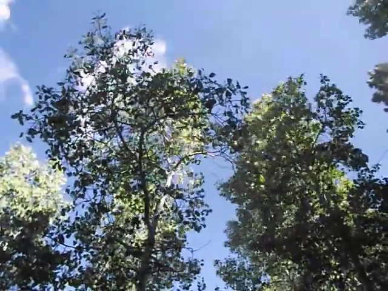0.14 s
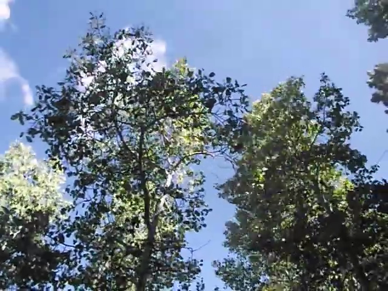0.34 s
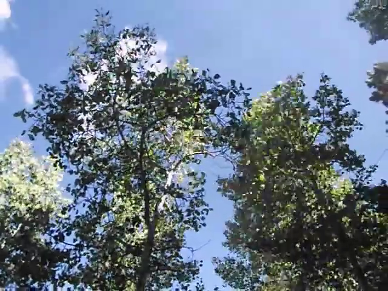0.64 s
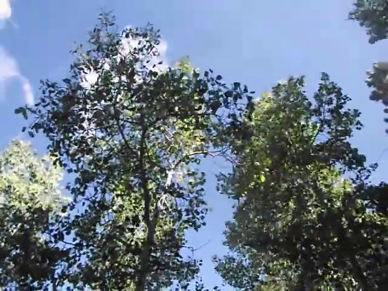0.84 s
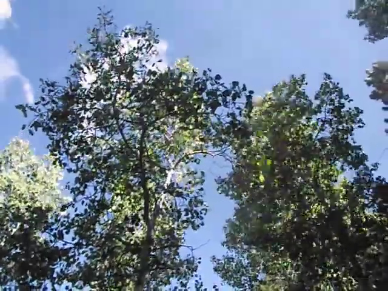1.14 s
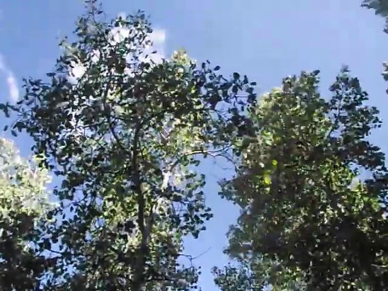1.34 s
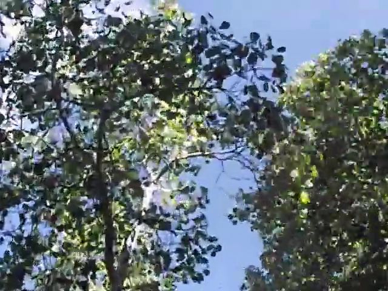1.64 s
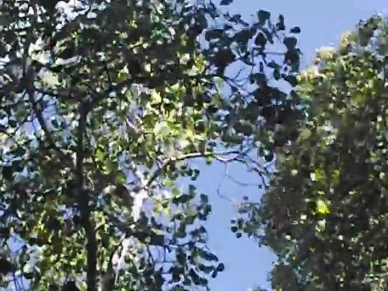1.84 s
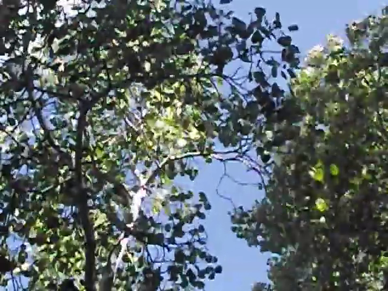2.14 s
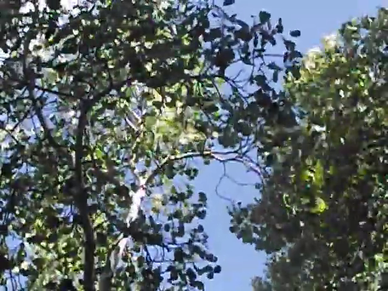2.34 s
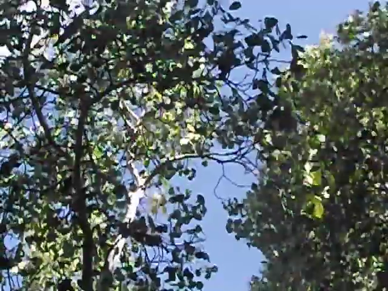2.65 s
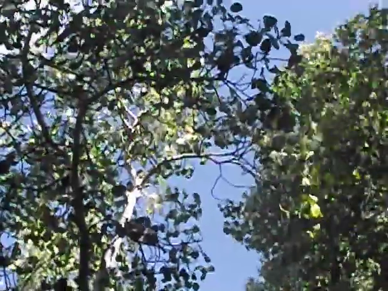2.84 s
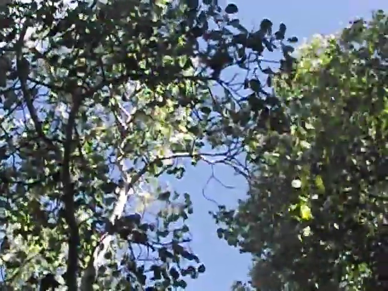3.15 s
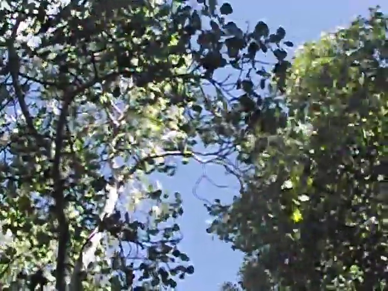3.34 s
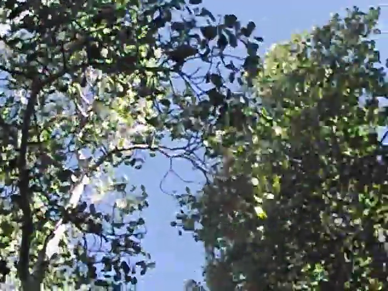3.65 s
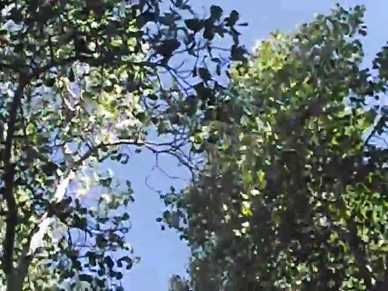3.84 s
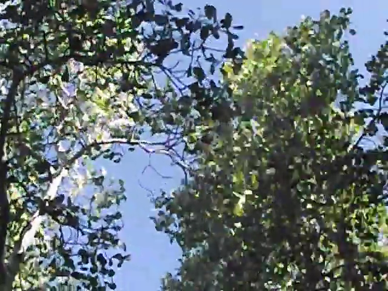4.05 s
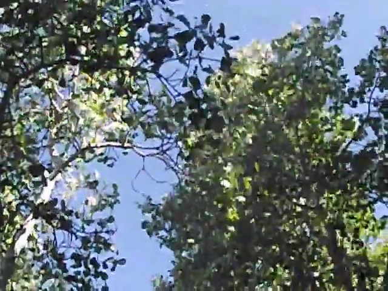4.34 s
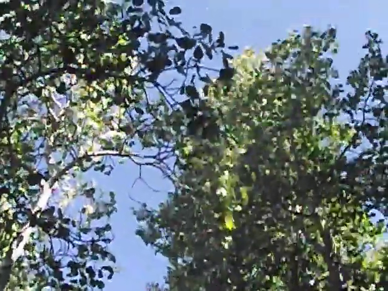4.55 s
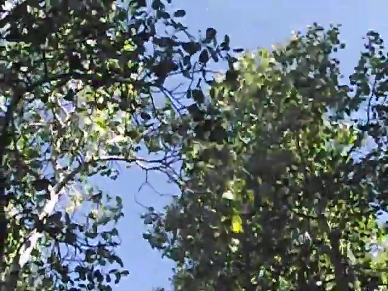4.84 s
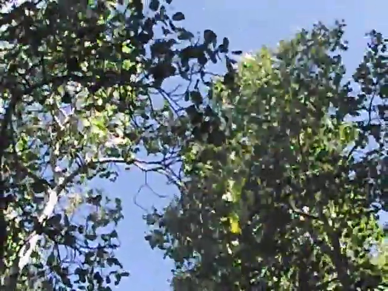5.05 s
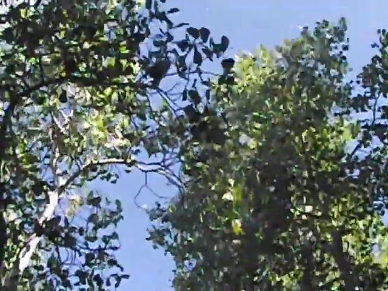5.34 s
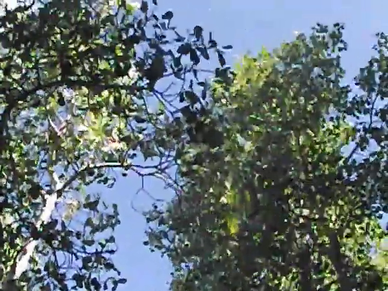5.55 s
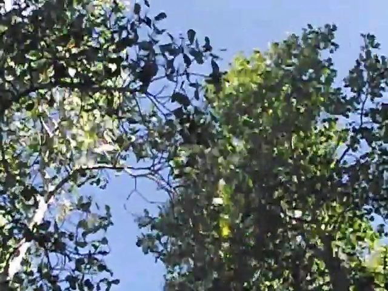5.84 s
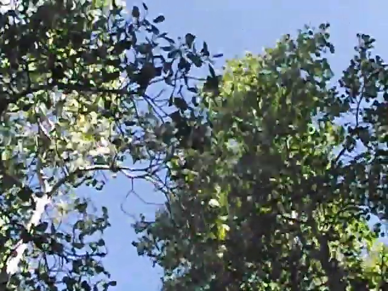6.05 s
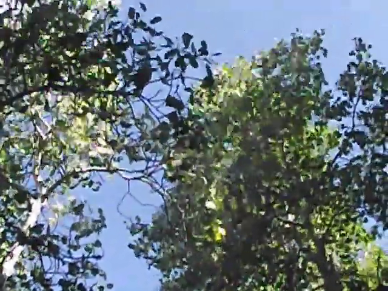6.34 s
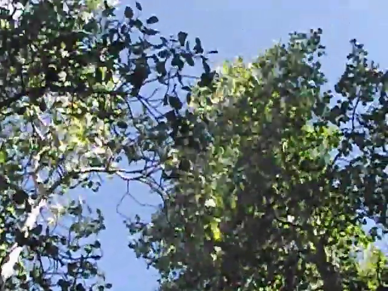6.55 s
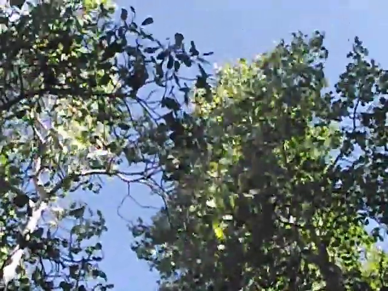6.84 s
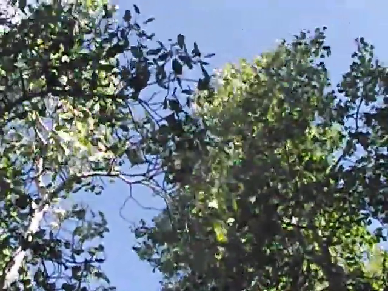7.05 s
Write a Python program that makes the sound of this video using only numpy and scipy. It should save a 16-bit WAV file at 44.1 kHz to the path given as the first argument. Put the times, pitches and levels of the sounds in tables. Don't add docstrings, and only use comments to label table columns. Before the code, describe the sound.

Countless small leaves hiss steadily in a light, fading breeze, with soft wind bumps at the microphone and one hard plastic snap around four seconds.

```python
import sys
import numpy as np
from scipy import signal
from scipy.fft import rfft, irfft, next_fast_len
from scipy.io import wavfile
from scipy.ndimage import uniform_filter1d

SR = 44100
rng = np.random.default_rng(int(sys.argv[2]) if len(sys.argv) > 2 else 0)


def invert_db(x):
    u = np.asarray(x, float) / 20
    return 10 ** u


def generate_wav(signal):
    frames = np.transpose(np.atleast_2d(signal))
    scaled = np.clip(frames, -1, 1) * 32767
    pcm = np.round(scaled).astype(np.int16)
    wavfile.write(sys.argv[1], SR, pcm)


N = 317961

# (time [s], strength [dB])
BREEZE = [(0.0, -1), (1.0, 0.5), (1.8, 0), (3.5, -3), (5.3, -5), (6.2, -5), (7.21, -7)]
# (frequency [Hz], level per Hz [dB])
LEAF_TONE = [(900, -21.5), (1700, -13), (2300, -7), (2700, -3), (3150, -0.43), (3400, -1.44), (3900, -7),
             (4400, -10), (4950, -12.5), (5200, -16), (5400, -22), (5500, -26)]
# (frequency [Hz], level per Hz [dB])
CANOPY_TONE = [(40, -2.5), (90, 0), (200, -0.2), (400, -2), (850, -1.8), (1200, -4), (2000, -6.5),
               (4000, -7.5), (5500, -19)]
# (frequency [Hz], level per Hz [dB])
EDDY_TONE = [(2, -7.5), (5, -4), (15, -2.5), (35, -8), (50, -11.5), (70, -20), (150, -47)]
# (time of peak [s], rise [dB], length [s])
GUSTS = [(.12, 5, 0.23), (.55, 8.5, 0.29), (1.1, 2.5, .2), (1.6, 3, .3), (3.8, 2.5, 0.32),
         (4.25, 2.5, 0.24), (5.28, 8, .2), (5.52, 6, .15), (5.88, 5.5, .25), (6.2, 4.5, .25), (6.75, 2, .4)]
# (start [s], pressure [full scale], rise [ms])
PUSHES = [(.005, -.05, 6), (.152, .06, 7), (.178, -.04, 11), (.472, -.05, 18), (.54, .045, 8),
          (1.82, -.03, 12), (4.67, -.04, 9), (5.765, .035, 14), (6.12, -.055, 20), (6.172, .145, 15),
          (6.254, .04, 9)]
# (frequency [Hz], level [dB], time to fall 60 dB [s])
SHELL_MODES = [(893, -6.5, 0.044), (1270, -15, 0.024), (1625, -10, 0.034), (2010, -11.5, 0.023),
               (2360, -1, 0.022), (2506, 1.5, 0.013), (2807, -1.5, 0.029), (3320, -8.5, 0.0037)]
# (time [s], ring [dB], buzz [dB], buzz length [ms], buzz pitch [Hz])
SNAPS = [
    (3.5678, -37, -27, 5.2, 1930),
    (3.5680, -40, -24, 5.0, 2350),
    (4.0122, -6.5, -1.3, 2.5, 2500),
    (5.7907, -31, -25, 2.8, 2250),
    (6.2555, -29, -29, 4.5, 2300),
    (6.2680, -34, -31, 3, 2400),
]
# (time [s], level [dB])
CREAKS = [
    (3.840, -22),
    (3.895, -23),
]
# (time [s], pitch [Hz], level [dB], time to fall 60 dB [s])
KNOCK = (1.415, 480, -30.5, .12)

LEAVES_DB, CANOPY_DB, BUFFET_DB = -33, -38.5, -42.5
CANOPY_FOLLOWS, CANOPY_LEADS_S = 0.63, 0.79
SWING_BACK, SWING_SLOWER = 0.35, 2.5
LOW_MODE_DB = 3.5
HUM_HZ, HUM_DB = 120.2, -61
OFFSET, CEILING = -0.0029, 0.72


def leaves(pats_per_s=24000, spread_db=1.33, flutter_db=0.57, cycles=3.27):
    out = np.zeros(N)
    t = np.arange(400) / SR
    pitches = np.geomspace(900, 5400, 16)
    for hz in pitches:
        chance = rng.random(N)
        size = np.minimum(rng.exponential(1, N), 5)
        hits = (chance < pats_per_s / len(pitches) / SR) * invert_db(spread_db * size)
        pat = np.sin(2 * np.pi * hz * t) * np.exp(-t * hz / cycles) * (1 - np.exp(-t * hz * 2))
        group = evened(signal.oaconvolve(hits, pat)[:N])
        out += group * invert_db(flutter_db * drift(12)) * np.sqrt(hz)
    spectrum = rfft(out)
    smooth = uniform_filter1d(abs(spectrum) ** 2, 1500)
    level = irfft(spectrum / np.sqrt(smooth + 1e-9), N)
    return invert_db(LEAVES_DB + breeze_db()) * colour(level, LEAF_TONE)


def wind(lumps_db=1.74):
    t = np.arange(N) / SR
    gusts_db = sum(db * np.exp(-np.log(16) * ((t - s) / length) ** 2) for s, db, length in GUSTS)
    loudness = invert_db(BUFFET_DB + gusts_db + lumps_db * drift(5))
    out = loudness * colour(rng.standard_normal(N), EDDY_TONE)
    for s, pressure, rise_ms in PUSHES:
        u = np.arange(SR // 2) * 1000 / SR / rise_ms
        v = u / SWING_SLOWER
        push = (u * np.exp(1 - u)) ** 2
        swing = (v * np.exp(1 - v)) ** 2
        add(out, s, pressure * (push - SWING_BACK * swing))
    return out


def shell(low_rise_ms=2.8, glide=0.24, overtone_hz=5300, overtone_db=-14):
    out = np.zeros(N)
    t = np.arange(4000) / SR
    slow = 1 - np.exp(-(t * 1000 / low_rise_ms) ** 2)
    rings = [invert_db(db - 60 * t / t60) * np.sin(2 * np.pi * hz * t) for hz, db, t60 in SHELL_MODES]
    for s, ring_db, buzz_db, buzz_ms, buzz_hz in SNAPS:
        u = np.clip(t * 1000 / buzz_ms, 0, 1)
        low_ring = invert_db(LOW_MODE_DB) * slow * rings[0]
        add(out, s, invert_db(ring_db) * (low_ring + u ** 2 * sum(rings[1:])))
        turns = np.cumsum(buzz_hz * (1 + glide * np.sin(0.8 * np.pi * u))) / SR
        overtone = invert_db(overtone_db + buzz_db) * u * np.sin(2 * np.pi * overtone_hz * t)
        buzz = np.sin(2 * np.pi * turns) + overtone
        add(out, s, invert_db(buzz_db) * np.sin(np.pi * u) ** 0.37 * buzz)
    for s, db in CREAKS:
        add(out, s, invert_db(db) * slow * rings[0])
    s, hz, db, t60 = KNOCK
    rise = 1 - np.exp(-t / 0.004)
    turn = 2 * np.pi * hz * (t - 1.5 * t ** 2)
    thump = np.sin(turn) + 0.34 * np.exp(-t / 0.012) * np.sin(2 * turn)
    add(out, s, invert_db(db - 60 * t / t60) * rise * thump)
    return out


def canopy(swell_db=0.5):
    breeze = CANOPY_FOLLOWS * breeze_db(CANOPY_LEADS_S)
    loudness = invert_db(CANOPY_DB + breeze + swell_db * drift(6))
    return loudness * colour(rng.standard_normal(N), CANOPY_TONE)


def hum():
    tone = np.sqrt(2) * np.sin(2 * np.pi * HUM_HZ * np.arange(N) / SR)
    return invert_db(HUM_DB + 2.2 * drift(2.5)) * tone


def breeze_db(leads_s=0):
    return np.interp(np.arange(N) / SR + leads_s, *np.transpose(BREEZE))


def drift(top_hz):
    t = np.arange(0, N + 64, 64) / SR
    speeds = np.geomspace(top_hz / 15, top_hz, 30)
    slow = sum(np.sin(2 * np.pi * (f * t + rng.random())) / np.sqrt(f) for f in speeds)
    return np.interp(np.arange(N) / SR, t, evened(slow))


def colour(x, points):
    hz, db = np.transpose(points)
    size = next_fast_len(N)
    f = np.fft.rfftfreq(size, 1 / SR)
    gain = invert_db(np.interp(np.log(f + 1), np.log(hz + 1), db)) * (f < SR / 8)
    return evened(irfft(rfft(x, size) * gain, size)[:N])


def evened(x):
    return x / np.sqrt(np.mean(x ** 2) + 1e-20)


def add(mix, s, sound):
    part = mix[round(s * SR):][:len(sound)]
    part += sound[:len(part)]


def scene():
    mono = leaves() + canopy() + wind() + shell() + hum()
    return np.array([mono, mono])


def top_cut(x):
    return signal.sosfilt(signal.butter(12, 16500, fs=SR, output="sos"), x)


def record(dry):
    longer = np.pad(dry, ((0, 0), (1000, 1000)), "wrap")
    limit = 0.955 * CEILING
    held = np.zeros_like(longer)
    held[:, ::4] = 4 * np.clip(longer[:, ::4] + OFFSET, -limit, limit)
    smooth = signal.firwin(127, SR / 8, window=("kaiser", 8.5), fs=SR)
    edge = signal.firwin(1001, 6270, window=("kaiser", 9), fs=SR)
    both = np.convolve(smooth, edge)[None]
    loud = signal.oaconvolve(held, both, "same")[:, 1000:-1000]
    loud *= signal.windows.tukey(N, 0.00005)
    return top_cut(np.clip(loud, -CEILING, CEILING))


dry = scene()
out = record(dry)
generate_wav(out)
```